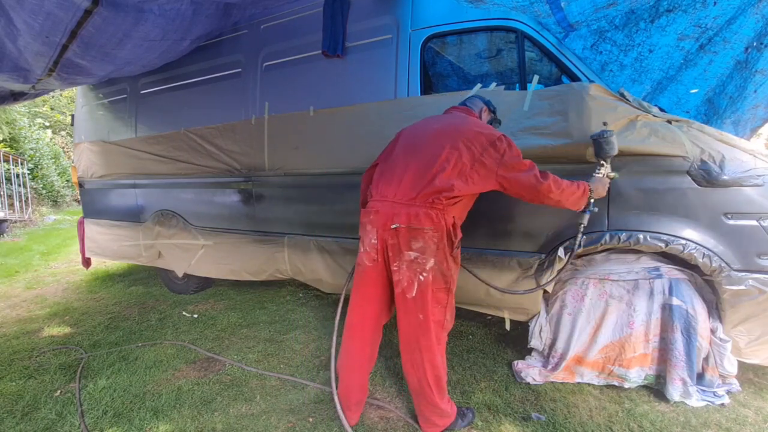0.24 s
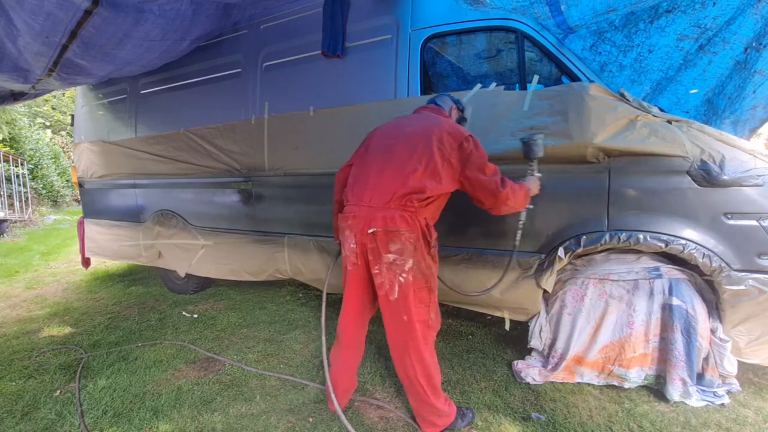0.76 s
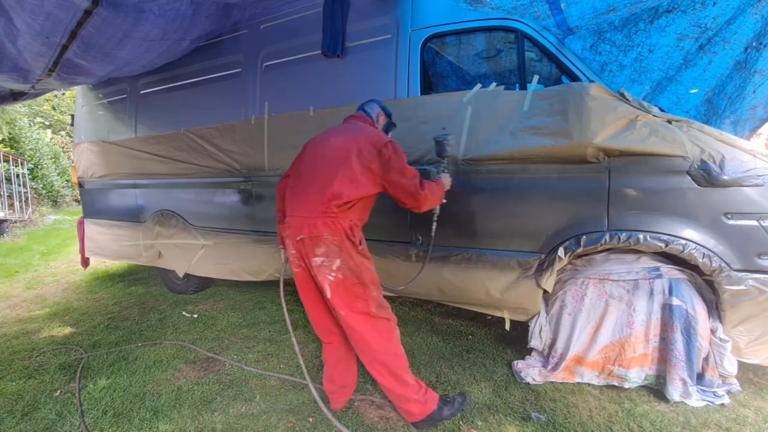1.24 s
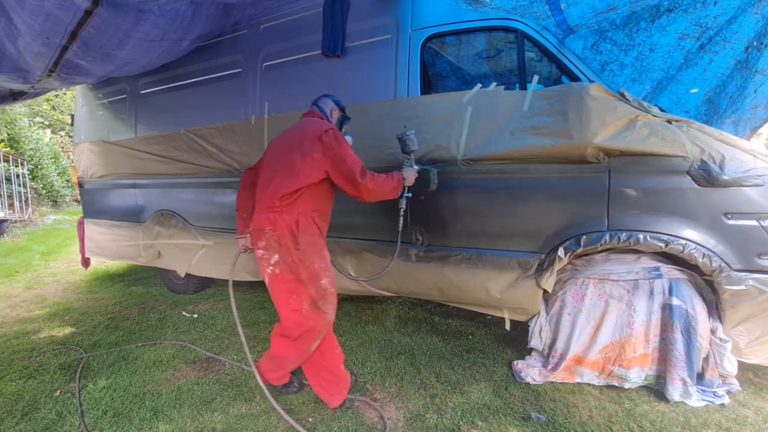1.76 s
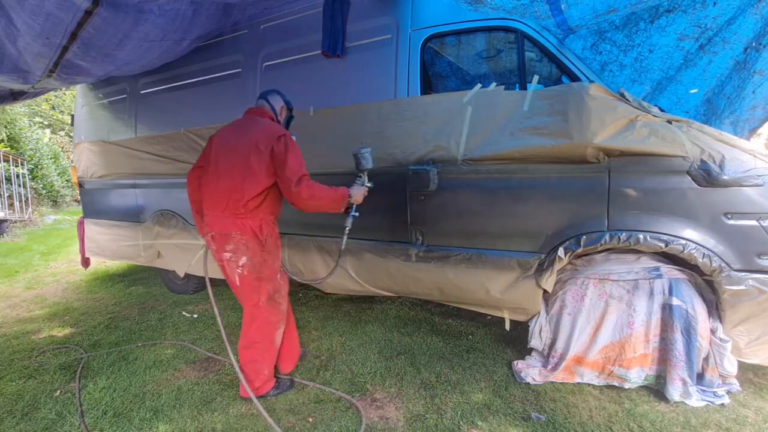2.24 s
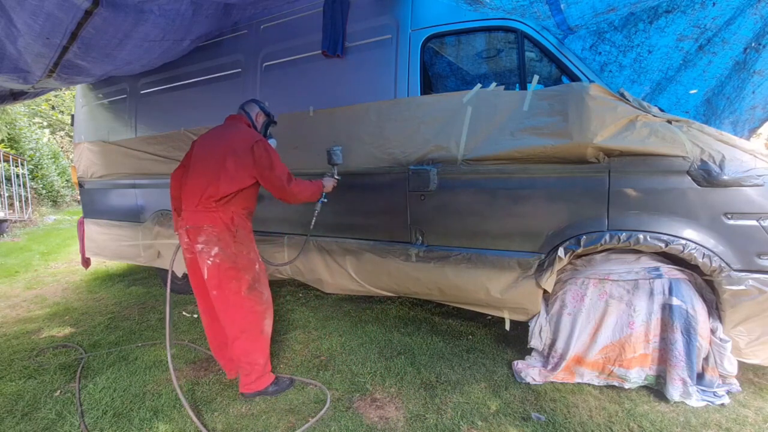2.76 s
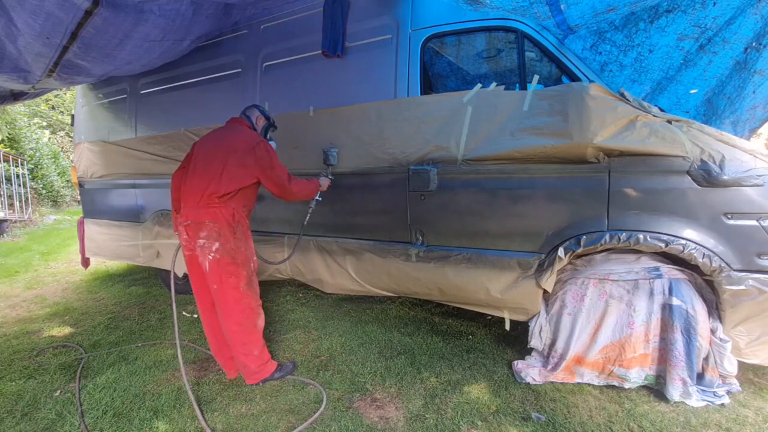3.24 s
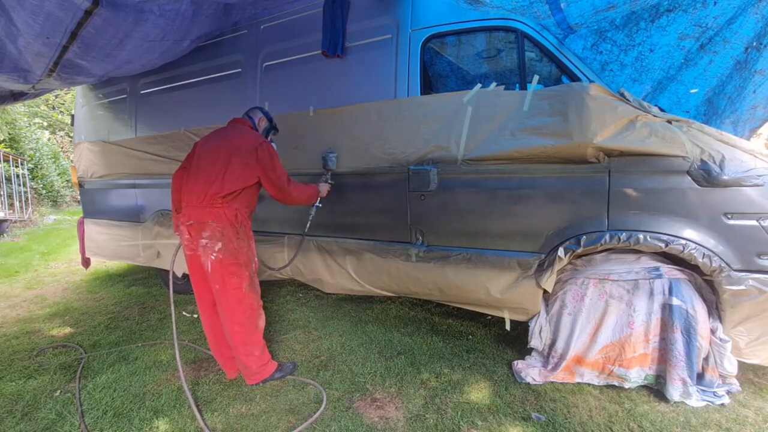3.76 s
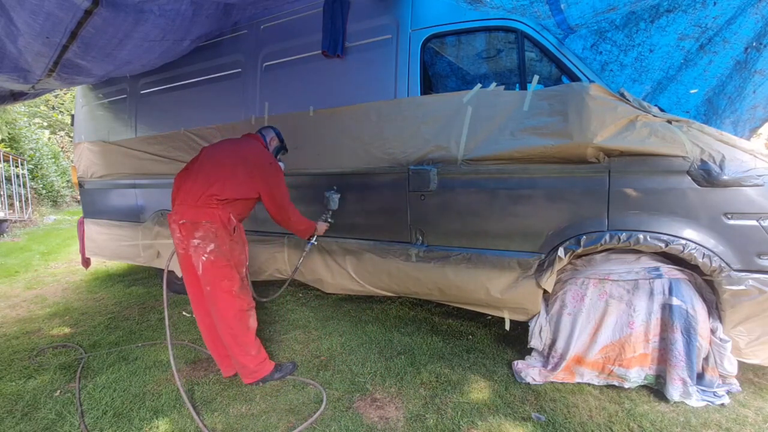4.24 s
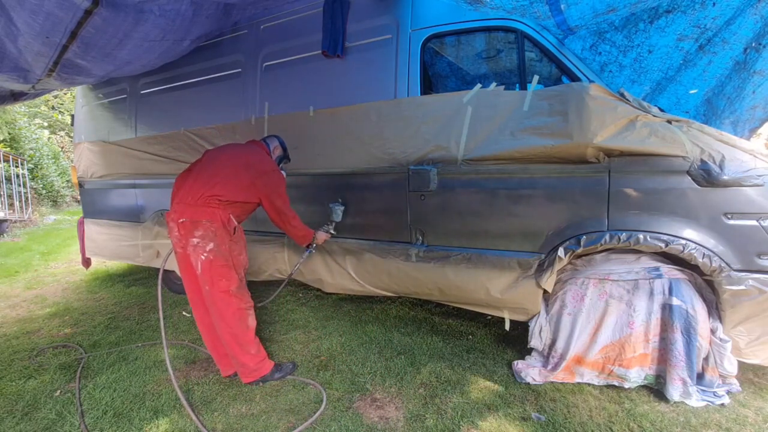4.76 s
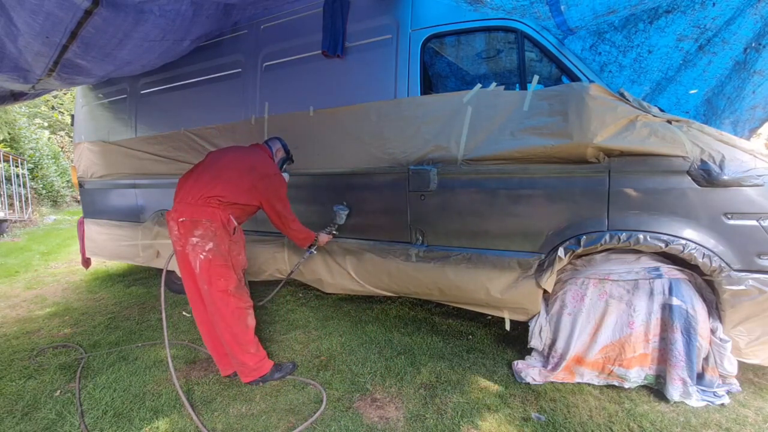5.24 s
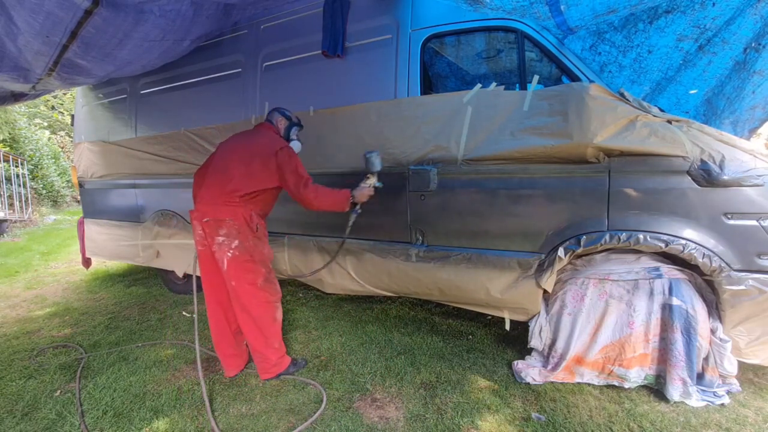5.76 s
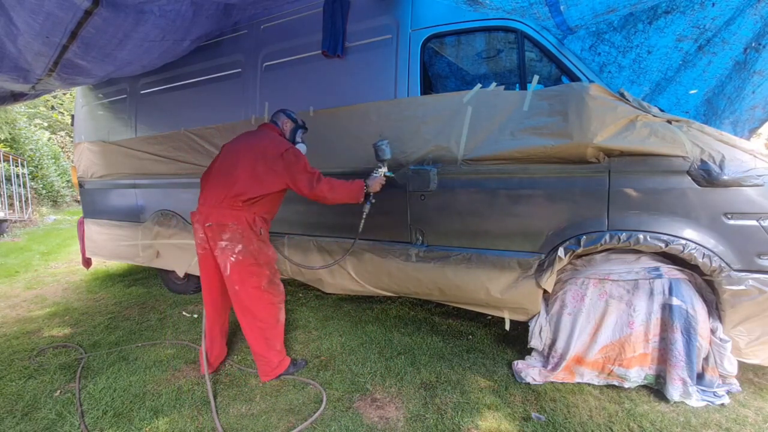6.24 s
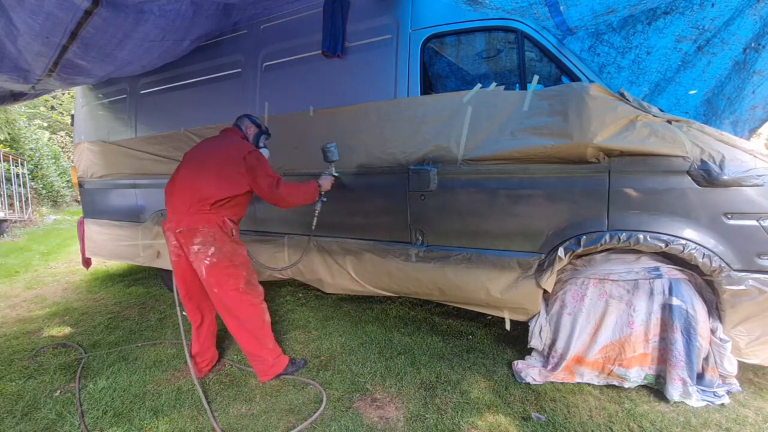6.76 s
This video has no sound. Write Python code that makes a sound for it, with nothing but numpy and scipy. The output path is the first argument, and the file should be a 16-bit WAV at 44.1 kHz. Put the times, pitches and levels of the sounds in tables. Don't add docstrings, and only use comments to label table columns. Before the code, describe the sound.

Outdoors under a tarpaulin, a spray gun blows bright, smooth, turbulent air against a van panel. The hiss stops abruptly, leaving a compressor alone for about a second, then returns stronger, stops briefly and resumes softer. Throughout, the nearby single-cylinder compressor thumps about thirteen times a second with rattling valves, weakening slightly about once a second. A small stereo camera microphone picks up both, with thin bass and faint close reflections.

```python
import sys
import numpy as np
from scipy import signal
from scipy.io import wavfile

SR = 44100
rng = np.random.default_rng(int(sys.argv[2]) if len(sys.argv) > 2 else 0)


def boost(x):
    u = np.asarray(x, float) / 20
    return 10 ** u


def log_audio(samples):
    frames = np.atleast_2d(samples).T
    limited = np.clip(frames, -1, 1)
    pcm = np.round(limited * 32767).astype(np.int16)
    wavfile.write(sys.argv[1], SR, pcm)


N = 308700
SECONDS = np.arange(N) / SR

# delay_ms, level_db
ECHOES = [(9, -13), (17, -14), (23, -16), (31, -18)]

# weak_stroke_s, weak_thump_db, recovering_thump_db,
# full_thump_db, knock_db
FALTERS = [
    (.0343, -30, -29, -21.5, -36.8),
    (.9636, -34, -26.5, -23, -37),
    (1.8883, -37, -28.4, -21.4, -37),
    (2.8163, -42, -26, -23, -38),
    (3.5889, -40, -31, -24, -39.5),
    (4.4389, -38, -30.5, -23.5, -37.2),
    (5.1375, -41, -27, -22, -37.3),
    (6.0649, -38, -32, -24, -39.5),
    (6.994, -28, -28, -24, -39),
]
STROKES_PER_S = 12.92
FALL_BEHIND_MS, BEHIND_SHAPE = 5.8, 1.5
RECOVERED_AFTER_STROKES = 3.8
SAG_DB, SAG_SHAPE = 5.5, 2.8
KNOCK_SWING_DB, UNEVEN = 1.1, .45

# pitch_hz, peak_db, t60_s, thump_share (0-1, the rest follows the knock)
INTAKE_MODES = [(51.2, -52, 0.24, 0.5), (100.9, -31.2, 0.051, 1), (159, -37, 0.091, 0.53),
                (252.5, -35.2, 0.099, 0.72)]
SUCTION_MS = -9.5
POP_HZ, POP_DB, POP_MS = 480, -5, -.2
POP_ECHO_MS, POP_ECHO_DB = 12, -7

# pitch_hz, level_db (re knock), t60_s
HEAD_MODES = [(335, -5.5, 0.03), (389.6, 0, 0.029), (474, 0.5, 0.018), (599.5, 2.5, 0.014),
              (1130, -8, 0.0069)]
# after_thump_ms, level_db, brightness_db_per_octave
SLAPS = [
    (-11, -11, 4.5),
    (12, 0, -1.5),
    (26.5, -0.5, 3),
    (34.5, -6.5, 0.5),
    (43, -10, 3.5),
]

# after_thump_ms, level_db
CLATTER_SWELL = [(-26, -5), (-24, 0), (-12, -2), (-7, 3), (-2, 1), (10, 1), (20, -1), (35, -4), (47, -5)]
# pitch_hz, level_db (per Hz)
CLATTER_TONE = [(40, -5), (100, -8), (160, -4), (205, -16), (260, -8), (400, -7), (650, -5.5), (900, -8.5),
                (2200, -11), (3000, -14.5), (5000, -16.5), (7900, -23), (9300, -21), (13000, -27)]
CLATTER_DB = -40
# pitch_hz, likeness (0-1)
CLATTER_LIKENESS = [(60, .95), (250, .8), (700, .5), (1800, .4), (3000, .06), (6000, .2), (13000, .2)]
CLATTER_EDGES_HZ = 40 * 2 ** np.arange(0, 8.9, .44)

# pitch_hz, width_hz, level_db, crossed_s
RECESS_MODES = [(255, 40, 1.5, 4.9), (310, 80, 3, 5.25), (730, 25, -3, 5.3), (971, 54, 2.5, 5.3),
                (1000, 60, -1.5, 4.72), (1150, 23, 1.5, 5.05), (1330, 150, -3, 4.8)]
RECESS_FROM_S, RECESS_SWELL_S, RECESS_DB = 4.33, .27, -46
CROSSING_DB_PER_S, RECESS_CREEP_DB_PER_S = 17, 1.5

# fully_open_s, let_go_s
PULLS = [
    (-1, 1.641),
    (2.79, 5.35),
    (5.69, 8),
]
LEAK_S, LEAK_DB, SNAP_S, SNAP_DB = .028, -21, .006, -12
CLOSE_DB_PER_S, CLOSE_DULLING = 500, .22

# pitch_hz, level_db (per Hz)
JET_TONE = [(880, -33), (1500, -25), (2200, -18), (2620, -23), (3090, -17), (3580, -20), (3870, -16),
            (6820, -10.5), (7820, -6), (9330, -7), (12300, -0.5), (15500, -1)]
# time_s, hiss_db, body_db (re hiss, set by the angle)
AIM = [(0, -28, -6), (.3, -28, -8.5), (.6, -27.5, -9), (.88, -27, -8), (1.22, -29, -10), (1.59, -31, -7),
       (2.8, -25, -12), (3.07, -26, -12.5), (3.73, -26.5, -12), (4.12, -26, -13), (4.53, -27, -13),
       (4.92, -26, -13), (5.3, -24, -12.5), (5.73, -26, -8.5), (6.13, -25, -10), (6.18, -29, -9),
       (6.56, -32, -5), (7, -32, -9)]
# time_s, level_db, rise_s, fall_s
FLARES = [(.504, 4, .1, .035), (1.625, 4.5, .035, .05), (2.91, 4, .1, .14), (3.12, 4, .05, .12),
          (3.29, 3, .05, .1), (3.46, 3, .07, .07), (3.61, 3.5, .08, .12), (3.77, 2.5, .04, .3),
          (4.05, 2.5, .25, .1), (5.695, 3, .02, .025), (5.815, 2, .08, .025), (5.916, 4, .07, .2)]
# time_s, left_lag_samples, likeness (0-1, left-right), left_over_right_db
GUN_PLACE = [(0, 10, .45, -3.5), (.5, 10, .55, -6.5), (.95, 6.8, .76, -5.5), (1.22, 5, .6, -6),
             (1.3, 3, .3, -3), (1.7, 1, .25, -1.5), (2.75, -4, .45, -1.2), (4.2, -3, .45, -1.2),
             (5.4, -3, .5, 0), (5.65, 0, .35, -2.3), (6.3, 0, .4, -2.2), (7, -3, .25, -2.2)]


def rms_one(x):
    return x / np.sqrt(np.mean(x ** 2) + 1e-20)


def at_hz(points, hz):
    points_hz, values = np.array(points).T[:2]
    return np.interp(np.log(hz), np.log(points_hz), values)


def over_time(table):
    s, *columns = np.transpose(table)
    return [np.interp(SECONDS, s, column) for column in columns]


def drift(rate_hz):
    r = np.exp(-80 * np.pi * rate_hz / SR)
    slow = signal.lfilter([1], [1, -2 * r, r * r], rng.standard_normal(N // 40 + 2002))[2000:]
    return np.interp(np.arange(N) / 40, np.arange(len(slow)), rms_one(slow - slow.mean()))


def late(x, samples):
    return np.interp(np.arange(N) - samples, np.arange(N), x)


def noise_bands(edges_hz):
    white = rng.standard_normal((2, 3, N))
    for k, (low, high) in enumerate(zip(edges_hz, edges_hz[1:])):
        band = signal.butter(2, [low, high], "band", fs=SR, output="sos")
        yield np.sqrt(low * high), signal.sosfilt(band, white[k % 2])


def clicks_at(seconds, level_db):
    at = np.round(seconds * SR).astype(int)
    inside = (at >= 0) & (at < N)
    return np.bincount(at[inside], boost(level_db)[inside], N)


def ring(clicks, hz, t60):
    loss, w = np.log(1000) / (t60 * SR), 2 * np.pi * hz / SR
    poles = [1, -2 * np.exp(-loss) * np.cos(w), np.exp(-2 * loss)]
    for _ in range(2):
        clicks = signal.lfilter([0, np.sin(w)], poles, clicks + 1e-18)
    return 2 * np.e * loss * clicks


def reflections(x):
    thin = signal.sosfilt(signal.butter(1, [250, 2500], "band", fs=SR, output="sos"), x)
    echoes = sum(boost(level_db) * late(thin, ms * SR / 1000) for ms, level_db in ECHOES)
    return np.outer([1, -1], echoes)


def crank():
    rows = []
    for (start, weak_db, low_db, full_db, knock_db), after in zip(FALTERS, FALTERS[1:]):
        gap_s = after[0] - start
        k = np.arange(round(gap_s * STROKES_PER_S))
        turn = k / len(k)
        lag_s = FALL_BEHIND_MS / 1000 * np.sin(np.pi * turn) ** BEHIND_SHAPE
        thump_db = np.interp(k, [0, 1, 2, RECOVERED_AFTER_STROKES], [weak_db, low_db, low_db, full_db])
        thump_db = thump_db - SAG_DB * turn ** SAG_SHAPE
        swing_db = KNOCK_SWING_DB * np.sin(2 * np.pi * turn + .6)
        rows += zip(start + turn * gap_s + lag_s, thump_db, knock_db - swing_db)
    rows = np.array(rows + [np.array(FALTERS[-1])[[0, 1, -1]]])
    return rows.T + UNEVEN * rng.standard_normal(rows.shape).T * [[0], [1], [1]]


def clatter(times, knock_db):
    nearest = np.clip(np.searchsorted(times - .030, SECONDS) - 1, 0, len(times) - 1)
    swell_db = np.interp(1000 * (SECONDS - times[nearest]), *np.transpose(CLATTER_SWELL))
    load_db = np.interp(SECONDS, times, knock_db) + 37
    out = 0
    for hz, (common, left, right) in noise_bands(CLATTER_EDGES_HZ):
        alike = np.clip(at_hz(CLATTER_LIKENESS, hz), 0, 1)
        depth = at_hz([(300, 0.11), (1500, 0.91), (11000, 1.17)], hz)
        gain = boost(at_hz(CLATTER_TONE, hz) + depth * swell_db + 0.51 * load_db + 0.75 * drift(18.0))
        shared = np.array([common, late(common, 7.23)])
        out = out + gain * (np.sqrt(alike) * shared + np.sqrt(1 - alike) * np.array([left, right]))
    return boost(CLATTER_DB + 1) * rms_one(out)


def pop(s, thump_db):
    r = np.exp(-2 * np.pi * POP_HZ / SR)
    s = s + POP_MS / 1000
    puffs = clicks_at(s, thump_db + POP_DB)
    puffs = puffs + clicks_at(s + POP_ECHO_MS / 1000, thump_db + POP_DB + POP_ECHO_DB)
    return np.e * (1 - r) * signal.lfilter([1], [1, -2 * r, r * r], puffs + 1e-18)


def intake(s, thump_db, knock_db):
    out = 0
    for k, (hz, level_db, t60, share) in enumerate(INTAKE_MODES):
        effort_db = share * (thump_db + 24) + (1 - share) * (knock_db + 37)
        suction = clicks_at(s + SUCTION_MS / 1000, level_db + effort_db)
        out = out + (-1) ** k * ring(suction, hz, t60)
    return out


def valve_slaps(s, knock_db):
    out = 0
    early = rng.standard_normal((len(s), len(SLAPS)))
    for hz, mode_db, t60 in HEAD_MODES:
        strong = rng.standard_normal((len(s), len(SLAPS)))
        hits = 0
        for k, (ms, slap_db, bright_db) in enumerate(SLAPS):
            level_db = knock_db + mode_db + slap_db + bright_db * np.log2(hz / 500) + 1.0 * strong[:, k]
            hits = hits + clicks_at(s + (ms + .22 * early[:, k]) / 1000, level_db)
        out = out + ring(hits, hz, t60)
    return out


def strokes(s, thump_db, knock_db):
    return pop(s, thump_db) + intake(s, thump_db, knock_db) + valve_slaps(s, knock_db)


def recess():
    out = 0
    for hz, width_hz, level_db, crossed_s in RECESS_MODES:
        r = np.exp(-np.pi * width_hz / SR)
        poles = [1, -2 * r * np.cos(2 * np.pi * hz / SR), r * r]
        hum = signal.lfilter([1, 0, -1], poles, rng.standard_normal(N))
        crossing_db = level_db - CROSSING_DB_PER_S * abs(SECONDS - crossed_s)
        out = out + rms_one(hum) * boost(crossing_db + 1.5 * drift(4.0))
    over = SECONDS - RECESS_FROM_S - RECESS_SWELL_S
    hum_db = RECESS_DB + np.where(over < 0, 20 * over / RECESS_SWELL_S, RECESS_CREEP_DB_PER_S * over)
    return out * boost(hum_db - 1.5 * CLOSE_DB_PER_S * np.clip(SECONDS - PULLS[1][1], 0, 1))


def trigger():
    leak_s, leak_db = [-1.5 * LEAK_S, -LEAK_S, -SNAP_S, 0], [-90, LEAK_DB, SNAP_DB, 0]
    opening = [np.interp(SECONDS - on, leak_s, leak_db) for on, _ in PULLS]
    closing = [-CLOSE_DB_PER_S * np.clip(SECONDS - off, 0, 1) for _, off in PULLS]
    pull = np.argmax(np.add(opening, closing), axis=0)
    closing_db = np.choose(pull, closing)
    return np.choose(pull, opening) + closing_db, -closing_db


def jet():
    hiss_db, body_db = over_time(AIM)
    flare_db = sum(np.interp(SECONDS - s, [-rise, 0, fall], [0, db, 0]) for s, db, rise, fall in FLARES)
    flow_db, died_db = trigger()
    hiss_db = hiss_db + flare_db + flow_db
    body_db = body_db - flare_db + CLOSE_DULLING * np.minimum(died_db, 40)
    flutter_db = 0.5 * drift(13.0) + 0.24 * drift(25.0)
    out = 0
    for hz, noise in noise_bands(np.geomspace(900, 19000, 19)):
        low_share = np.clip(np.log2(9500 / hz) / 0.9, 0, 1)
        band_db = at_hz(JET_TONE[:-1], hz) + low_share * (body_db + 14.5)
        out = out + noise * boost(band_db + flutter_db + 0.34 * drift(6.8))
    common, left, right = out / np.sqrt(np.mean(out[:, died_db == 0] ** 2))
    lag, alike, pan_db = over_time(GUN_PLACE)
    left = np.sqrt(alike) * late(common, np.round(lag)) + np.sqrt(1 - alike) * left
    right = np.sqrt(alike) * common + np.sqrt(1 - alike) * right
    return boost(hiss_db + 5.9) * np.array([left * boost(pan_db / 2), right * boost(-pan_db / 2)])


def scene():
    times, thump_db, knock_db = crank()
    thumps = strokes(times, thump_db, knock_db)
    machine = np.array([thumps * boost(2.5), late(thumps, 7.2) * boost(4.0)])
    machine = machine + reflections(thumps) + clatter(times, knock_db)
    hum = recess()
    hollow = np.array([hum * boost(1.0), late(hum, 4.3) * boost(3.0)]) + reflections(hum)
    return machine + hollow + jet()


def top_cut(x):
    return signal.sosfilt(signal.butter(12, 17090, fs=SR, output="sos"), x)


def record(dry):
    bass_cut = signal.butter(4, 42, "high", fs=SR, output="sos")
    steep_top = signal.ellip(12, .5, 70, 15750, fs=SR, output="sos")
    mix = signal.sosfiltfilt(bass_cut, dry, padtype="even", padlen=SR // 10)
    mix = signal.sosfilt(steep_top, mix)
    return top_cut(mix)


dry = scene()
out = record(dry)
log_audio(out)
```